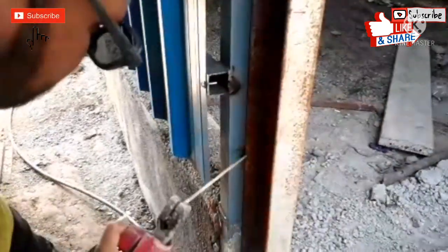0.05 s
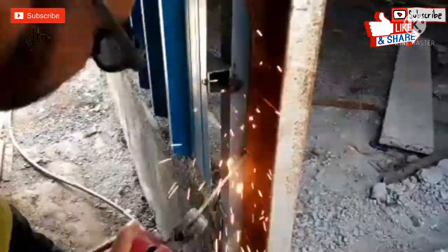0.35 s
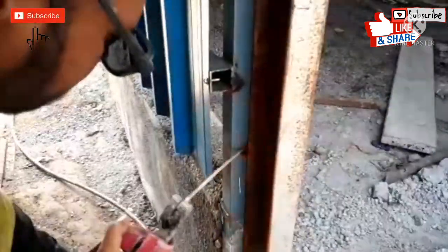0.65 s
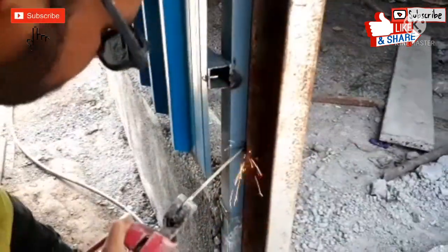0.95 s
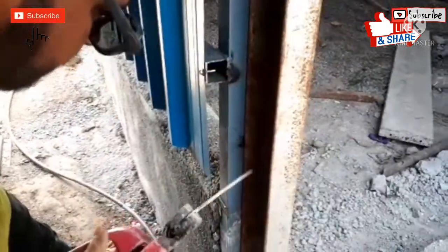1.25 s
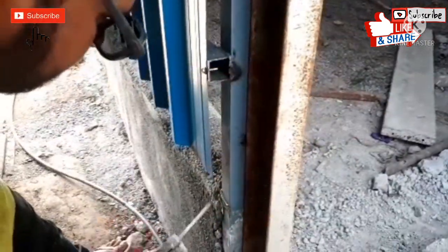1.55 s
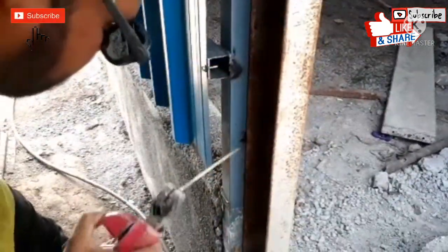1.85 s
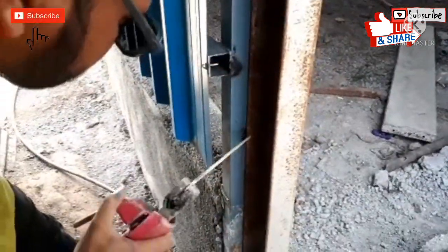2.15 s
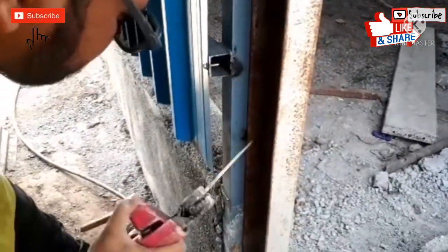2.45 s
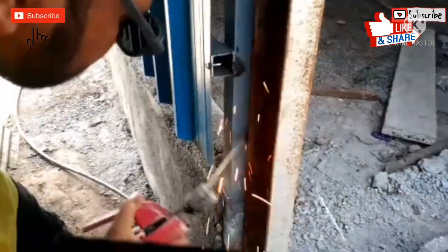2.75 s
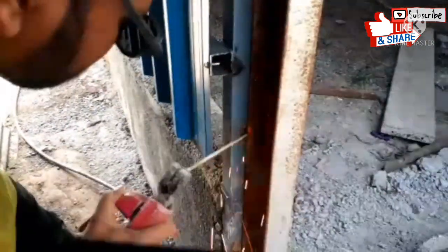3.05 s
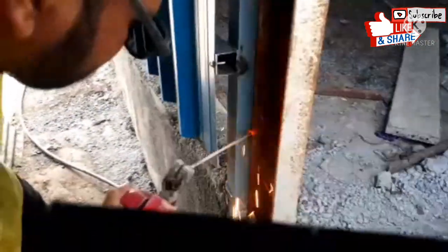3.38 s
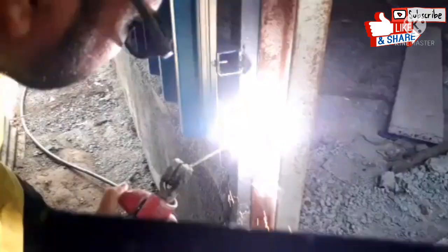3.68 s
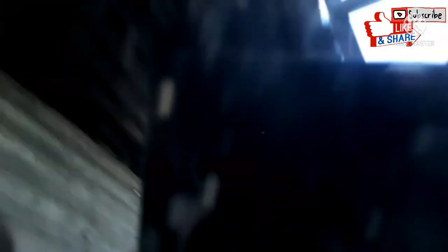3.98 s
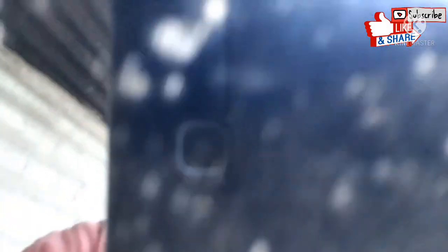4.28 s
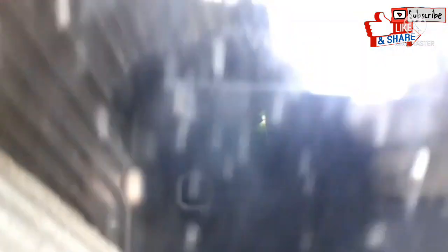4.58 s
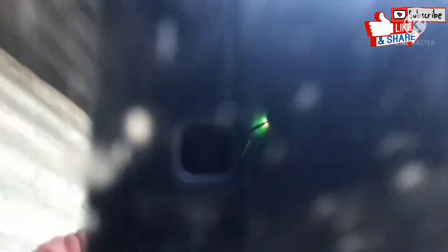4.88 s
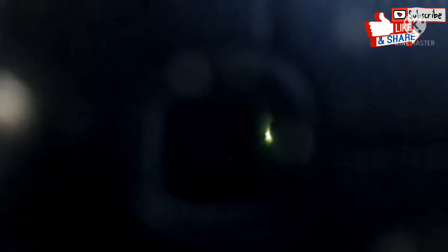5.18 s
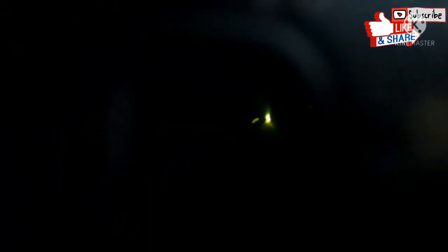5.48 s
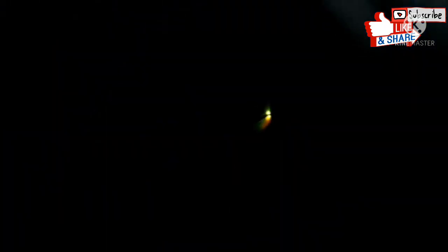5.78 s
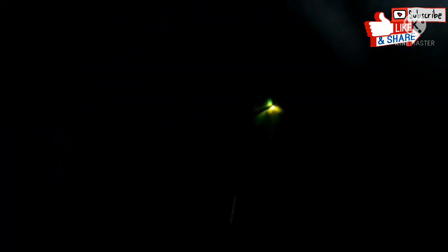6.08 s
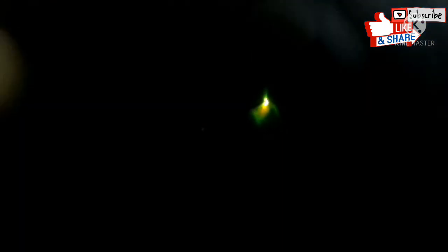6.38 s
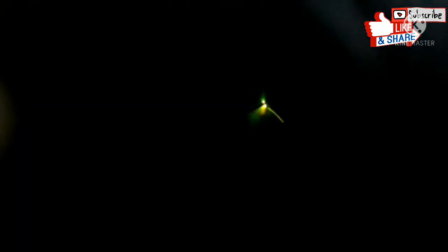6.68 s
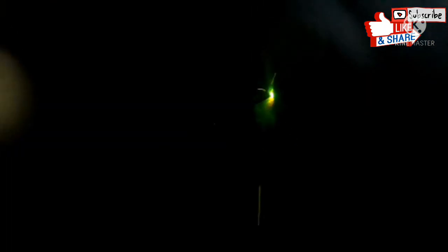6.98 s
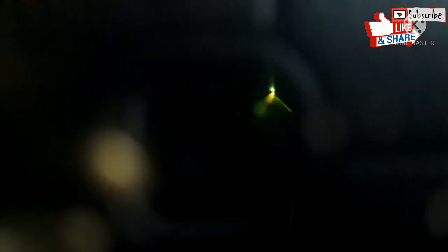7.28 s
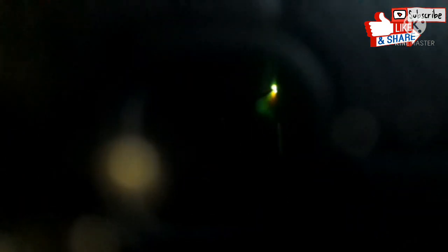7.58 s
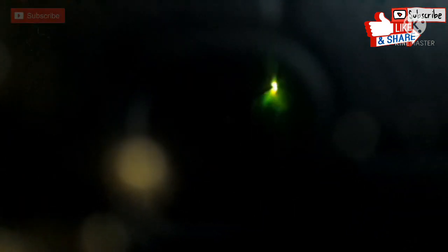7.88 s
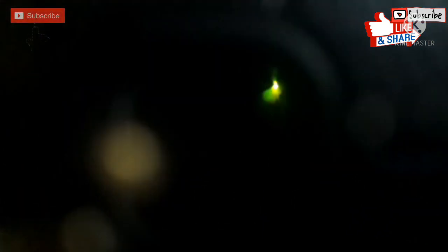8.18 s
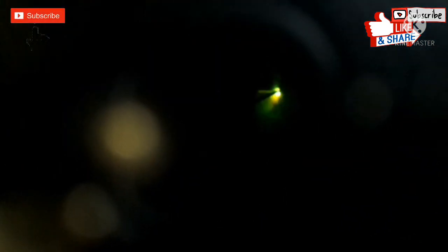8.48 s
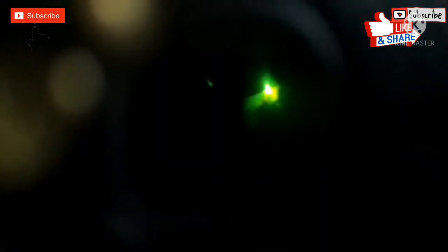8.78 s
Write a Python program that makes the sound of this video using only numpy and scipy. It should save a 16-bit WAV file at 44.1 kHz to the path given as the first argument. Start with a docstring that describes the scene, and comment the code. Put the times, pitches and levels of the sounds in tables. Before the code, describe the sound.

At about 0.3 seconds a welding arc spits briefly. From 0.5 to 2.5 seconds the rod taps and scratches on a steel frame and the floor, making light ringing clinks and dry ticks, with a pop at 1 second and the strongest clink near 1.4. Between 2.6 and 4 seconds several short arcs crackle and break off, the last lasting a little longer. After a brief gap, the arc catches at about 4.6 seconds and holds until the end, around 9 seconds, as a bright, buzzing sizzle. Molten drops burst through it in sharp, irregular pops, some with a low thump that slightly overloads the microphone. Near 5.1 seconds the sizzle turns thinner and drier as the microphone moves behind the welding shield. Everything is close, with faint workshop noise, little echo and a few dull handling bumps, mostly in the first three seconds.

```python
"""Open workshop, close to a steel door frame being stick welded.
The rod knocks and scratches on the frame and the floor, strikes a few short arcs, then holds one that
sizzles on every mains half wave. Each strike starts hot; the long ones settle. Molten drops burst with
sharp pops that overload the microphone, which moves behind the welding shield soon into the held arc."""
import sys
import numpy as np
from scipy import signal
from scipy.fft import rfft, irfft
from scipy.io import wavfile
from scipy.ndimage import uniform_filter1d

SR = 44100
rng = np.random.default_rng(int(sys.argv[2]) if len(sys.argv) > 2 else 0)


def unload_audio(sound):
    """Save the sound as a 16-bit wav file, at the path given as the first command line argument."""
    columns = np.transpose(np.atleast_2d(sound))
    # keep every value between -1 and 1, then stretch to whole-number steps
    steps = np.round(np.clip(columns, -1, 1) * 32767)
    wavfile.write(sys.argv[1], SR, steps.astype(np.int16))


N = 399105
TIME = np.arange(N) / SR
HALF_WAVE_HZ, CUTOFF_HZ = 100, 15700


def from_db(db):
    return 10 ** (np.asarray(db) / 20)


def unit_rms(x):
    return x / np.sqrt(np.mean(x ** 2) + 1e-20)


def unit_pop(x):
    """Scale to the energy of 4 ms at rms 1."""
    return x / np.sqrt(np.sum(x ** 2) / (.004 * SR))


def curve(rows):
    """Interpolate (t/s, value) rows at every sample."""
    return np.interp(TIME, *np.transpose(rows))


def drift(rate_hz):
    """Random wander, rms 1."""
    knots_s = np.arange(0, 10, 1 / rate_hz)
    values = rng.standard_normal(4096)[:len(knots_s)]
    return unit_rms(np.interp(TIME, knots_s, values))


def add(out, start_s, sound):
    """Mix a sound in at start_s."""
    i = max(round(start_s * SR), 0)
    out[i:i + len(sound)] += sound[:max(N - i, 0)]


def noise_burst(decay_s):
    """Noise with instant onset and exponential decay."""
    return rng.standard_normal(SR) * np.exp(-TIME[:SR] / decay_s)


def colour(x, spectrum, resonances=(), depth=1):
    """Unit-power minimum-phase filter from (f/Hz, level/dB) rows; depth scales the resonance peaks."""
    size = 4096
    hz = np.arange(size // 2 + 1) * SR / size + 1
    points_hz, points_db = np.transpose(spectrum)
    db = np.interp(np.log(hz), np.log(points_hz), points_db)
    for centre_hz, width_hz, peak_db in resonances:
        db += depth * peak_db / (1 + (2 * (hz - centre_hz) / width_hz) ** 2)
    gain = from_db(db)
    gain /= np.sqrt(np.mean(gain ** 2 * (hz < CUTOFF_HZ)))
    cepstrum = irfft(np.log(gain))[:size // 2]
    cepstrum[1:] *= 2
    response = irfft(np.exp(rfft(cepstrum, size)))
    return signal.oaconvolve(x, response)[:N]


def ring(x, hz, t60_s):
    """Damped mode; passes white noise at equal power."""
    r, w = 10 ** (-3 / (t60_s * SR)), 2 * np.pi * hz / SR
    gain = np.sin(w) * np.sqrt(2 * (1 - r * r))
    return signal.lfilter([gain], [1, -2 * r * np.cos(w), r * r], x + 1e-18)


def echoes(x, echo_db, count=14, first_s=.0007064, last_s=.007, sway_s=.00005):
    """Short echoes off near surfaces, at unchanged power; the comb shifts as the microphone sways."""
    out, gain = x.copy(), from_db(echo_db)
    for delay_s in np.geomspace(first_s, last_s, count) * rng.uniform(.93, 1.07, count):
        lag_s = delay_s + sway_s * drift(.97)
        out += rng.choice([-1, 1]) * gain * np.interp(TIME - lag_s, TIME, x)
    return out / np.sqrt(1 + count * gain ** 2)


def behind_shield(at_s=5.11, move_s=.15):
    """Microphone position: 0 in the open, 1 behind the shield."""
    return np.clip((TIME - at_s) / move_s + .5, 0, 1)


# background level: t/s, level/dB
BACKGROUND_LEVEL = [(0, -64), (.5, -56.5), (1.3, -51.5), (2.2, -51.5), (2.75, -47), (3.3, -59),
                    (4.25, -60.5), (4.55, -51), (9.05, -50.5)]
# background spectrum: f/Hz, level/dB
BACKGROUND_SPECTRUM = [(18, -52), (30, -24), (79, -3.5), (141, -5), (252, -11.5), (404, -10), (684, -14),
                       (1010, -13), (2010, -12.5), (2750, -11), (5450, -21.5), (8300, -19.5), (10200, -33),
                       (14800, -29), (16000, -50.5)]

def background():
    """Low workshop noise that swells and sinks."""
    return from_db(curve(BACKGROUND_LEVEL)) * colour(rng.standard_normal(N), BACKGROUND_SPECTRUM)


# rod knocks: t/s, level/dB, contact decay/s, share into the rod rather than the frame/0-1
KNOCKS = [(0.228, -45, .012, .05), (0.539, -49, .013, .5), (0.728, -36, 0.041, 0.71),
          (.831, -40, 0.0092, .05), (1.434, -22.5, 0.021, 1), (1.477, -30.5, 0.011, 1),
          (1.699, -36.5, 0.007, 0.4), (1.876, -40, 0.0037, .2), (2.063, -40.5, 0.0069, 0.7),
          (2.343, -30, 0.019, .28), (2.581, -22, 0.0055, 0), (2.84, -34, 0.011, .2)]
# rod modes: f/Hz, level/dB, t60/s
ROD_MODES = [(995, -16, 0.26), (1750, -12, 0.29), (2350, -29, 0.11), (2700, -30, .15), (3053, -0.5, 0.15),
             (3500, -24, .15), (3800, -19.5, 0.2), (4385, -21, .2), (4795, -11, 0.1), (5400, -16.5, 0.15),
             (6790, -19, .13), (7900, -12.5, 0.12)]
# hollow steel frame modes: f/Hz, level/dB, t60/s
FRAME_MODES = [(492, -4.5, 0.42), (510, -11, 0.54), (757, -6.5, 0.13), (1005, -8, 0.2), (1599, -1.5, 0.36),
               (1740, -5.5, 0.082), (2350, -10.5, 0.33), (2470, -10, 0.34), (2700, -18, 0.23),
               (3316, -22, .22), (4890, -10, 0.19), (6713, -19, .13)]
# contact and shimmer spectrum: f/Hz, level/dB
CLANK_SPECTRUM = [(200, -51), (650, -21), (900, 0), (1350, -11.5), (1800, -0.5), (3100, 0.5), (4500, -6.5),
                  (6000, -12.5), (8000, -8), (10500, -24), (15000, -25)]

def knocks(rod_db=-1, frame_db=-2, clank_db=-1, shimmer_db=-11, shimmer_s=.072):
    """Each knock chatters, rings the rod, the frame or both, and leaves a shimmer of weak modes."""
    on_rod, on_frame, shimmer = np.zeros((3, N))
    for start_s, db, decay_s, share in KNOCKS:
        contact = from_db(db) * noise_burst(decay_s)
        add(on_rod, start_s, share * contact)
        add(on_frame, start_s, (1 - share) * contact)
        add(shimmer, start_s, from_db(db + shimmer_db) * noise_burst(shimmer_s))
    rod = sum(from_db(db + rod_db) * ring(on_rod, hz, t60_s) for hz, db, t60_s in ROD_MODES)
    frame = sum(from_db(db + frame_db) * ring(on_frame, hz, t60_s) for hz, db, t60_s in FRAME_MODES)
    clank = from_db(clank_db) * (on_rod + on_frame)
    return rod + frame + colour(clank + shimmer, CLANK_SPECTRUM)


# grip bumps: t/s, level/dB, decay/s
BUMPS = [(.258, -44.5, 0.033), (0.778, -47, 0.034), (.859, -45, .015), (1.315, -34.5, 0.0054),
         (1.681, -40.5, 0.026), (2.249, -39, 0.0085), (2.34, -42, 0.014), (2.661, -42, 0.068),
         (2.73, -38.5, 0.063), (5.83, -42, .4)]

def handling(aiming_s=(.5, 3.9), fidgets=7, fidget_db=-46, fidget_decay_s=.014):
    """Dull bumps as the hand shifts its grip, plus faint random ones while the rod is aimed."""
    out = np.zeros(N)
    faint = [(start_s, fidget_db, fidget_decay_s) for start_s in rng.uniform(*aiming_s, fidgets)]
    for start_s, db, decay_s in BUMPS + faint:
        add(out, start_s, from_db(db) * noise_burst(decay_s))
    dull = [(30, -23.5), (80, 2), (130, 1), (220, -4), (450, -20.5), (1500, -53), (8000, -78.5)]
    return colour(out, dull)


# short arcs: start/s, stop/s, settled level/dB
STRIKES = [(0.276, 0.339, -35), (2.602, 2.695, -31.5), (2.888, 2.951, -30.5), (3.19, 3.261, -33.5),
           (3.492, 3.562, -36.5), (3.586, 4.003, -36.5)]
# held arc: t/s, level/dB
WELD_LEVEL = [(4.72, -27), (4.77, -29.5), (4.91, -28.5), (5.06, -33.5), (5.12, -34), (5.73, -39),
              (5.89, -36.5), (6.54, -32), (6.87, -33.5), (7.25, -34), (7.34, -37.5), (8.11, -33.5),
              (8.45, -31.5), (8.95, -33.5), (9.05, -36.5)]

def arc_gain(build_s=.0085, hot_db=7.5, hot_s=.09, settle_s=.031,
             weld_start_s=4.552, weld_hot_db=2, weld_hot_s=.17, waver_db=1.62, waver_hz=12):
    """Arc strength: strikes build, burn hot, settle if they last, and break; the weld holds."""
    gain = np.zeros(N)
    for start_s, stop_s, db in STRIKES:
        age_s = np.maximum(TIME - start_s, 0)
        build = 1 - np.exp(-age_s / build_s)
        hot = np.clip(1 - (age_s - hot_s) / settle_s, 0, 1)
        gain += (TIME < stop_s) * build * from_db(db + hot_db * hot)
    age_s = np.maximum(TIME - weld_start_s, 0)
    build = 1 - np.exp(-age_s / build_s)
    gain += build * from_db(curve(WELD_LEVEL) + weld_hot_db * (age_s < weld_hot_s))
    return uniform_filter1d(gain, size=60) * from_db(waver_db * drift(waver_hz))


def sizzle(peak_s=.0015, jitter_s=.0007, flare_s=.0015, fade_s=.0015, uneven_db=6,
           spark_rate=90, spark_db=2.5, spark_s=.0014):
    """The arc flares on each mains half wave, never twice alike, and throws tiny sparks."""
    phase = ((TIME - peak_s + jitter_s * drift(40)) * HALF_WAVE_HZ + .5) % 1 - .5
    from_peak_s = phase / HALF_WAVE_HZ
    flare = np.exp(-(2 * from_peak_s / flare_s) ** 2) * from_db(uneven_db * drift(100))
    linger = np.exp(-1 / (fade_s * SR))
    power = signal.lfilter([1 - linger], [1, -linger], flare)
    power = power / power.mean() + .13   # hiss floor between flares
    fires = rng.random(N) < spark_rate * power / SR
    sparks = fires * from_db(spark_db * np.minimum(rng.exponential(1, N), 4))
    spray = signal.lfilter([1], [1, -np.exp(-1 / (spark_s * SR))], sparks + 1e-18)
    return unit_rms(rng.standard_normal(N) * np.sqrt(power + spray ** 2))


# arc spectrum in the open: f/Hz, level/dB
OPEN_SPECTRUM = [(60, -38), (150, 3), (400, 0), (800, 4), (1500, 6.5), (2500, 5), (4200, 4.5), (5800, 3.5),
                 (6700, 11.5), (8400, 12.5), (9700, 2), (11000, -3.5), (13000, 5), (15000, 7.5)]
# resonances of the gap between the steel posts: f/Hz, width/Hz, peak/dB at depth 1
GAP_RESONANCES = [(488, 45, 10), (890, 120, 5.5), (1133, 36, 10), (1925, 77, 5), (2330, 24, 6),
                  (2900, 33, 0), (3366, 310, 9.5), (5180, 460, 6.5), (6700, 330, 3.5), (8770, 520, 4.5)]
# arc spectrum behind the shield: f/Hz, level/dB
SHIELDED_SPECTRUM = [(60, -23), (150, 2.5), (400, -13), (800, -6), (1500, -6), (2000, -8), (4200, -1),
                     (5900, -4.5), (6600, 5), (8400, 8), (9700, -9.5), (11000, -6), (13000, 1.5),
                     (15000, 3.5)]
# resonances of the space behind the shield: f/Hz, width/Hz, peak/dB at depth 1
SHIELD_RESONANCES = [(765, 360, 5), (1140, 68, -0.5), (1990, 430, 5), (2387, 250, 5), (2740, 230, 4),
                     (3430, 790, 3), (4540, 140, 2.5), (5080, 310, 5), (6620, 1140, 4.5), (8150, 350, 3),
                     (8660, 140, -1.5), (14000, 610, 3)]

def arc(gain):
    """The sizzle sounds through the gap between the posts; the shield then recolours it."""
    source, behind = gain * sizzle(), behind_shield()
    in_open = colour(source * (1 - behind), OPEN_SPECTRUM, GAP_RESONANCES, depth=1.06)
    shielded = colour(source * behind, SHIELDED_SPECTRUM, SHIELD_RESONANCES, depth=1.34)
    return echoes(in_open, echo_db=-16) + echoes(shielded, echo_db=-17.5)


# pops of molten metal, from small spits to heavy drops, some bursting twice:
# t/s, crack/dB, blast/dB, thump/dB, second burst strength/0-1
POPS = [(0.29, -21, -35, -55, 0), (0.3208, -19.5, -35, -63, 1), (1.0114, -17.5, -28.5, -42.5, 0),
        (2.611, -14.5, -28.5, -44, .7), (2.6716, -10.5, -33.5, -36, 0), (2.921, -18.5, -32, -57, 0),
        (2.9307, -11.5, -29.5, -22, .7), (3.2208, -21.5, -24.5, -23, .2), (3.242, -13.5, -52, -23, .3),
        (3.3111, -13, -18.5, -15, 0), (3.5405, -20, -24.5, -15, 0), (3.5849, -15, -30, -17.5, 0),
        (3.83, -26.5, -46, -58, 0), (3.886, -26.5, -50.5, -58, 0), (4.6808, -16, -52, -58, 0),
        (4.743, -14, -32, -49, .3), (4.763, -8.5, -49, -35, 0), (4.8192, -11, -35, -19, 0),
        (4.9007, -14.5, -38, -50, 0), (4.9647, -18, -45, -30, 0), (4.924, -17, -47, -54, 0),
        (5.03, -17.5, -37, -57, .6), (5.064, -14.5, -23.5, -19.5, 1), (5.319, -16, -40, -16.5, 0),
        (5.3599, -18, -24.5, -15, 0), (5.4927, -15.5, -16, -16.5, .9), (5.6408, -15, -29, -21.5, 0),
        (5.7241, -14.5, -29.5, -19, 0), (5.922, -17.5, -26.5, -15, .15), (6.0632, -14, -26, -12, 0),
        (6.3, -21.5, -36.5, -36, 0), (6.4208, -19, -66, -36, 0), (6.5507, -11, -30, -22, .4),
        (6.6, -17.5, -20.5, -27, 0), (6.63, -13.5, -23, -25, 0), (6.6853, -17.5, -27, -23, 0),
        (6.7212, -13, -18, -15, 0), (6.8234, -22.5, -46, -42, 0), (6.8693, -19, -40, -21, 0),
        (6.9911, -15.5, -46, -37.5, 0), (7.0207, -14, -41, -23.5, 0), (7.1036, -12.5, -28, -24.5, 0),
        (7.1753, -17, -22, -17, 0), (7.272, -17, -28, -32, 0), (7.3209, -14.5, -20.5, -26.5, 0),
        (7.3799, -18, -25.5, -20, 0), (7.44, -19, -30.5, -14, 0), (7.5654, -24, -25, -14, 0),
        (7.5833, -16.5, -23, -17, .6), (7.7208, -16.5, -30, -14.5, 0), (7.7916, -18, -29, -25.5, 0),
        (7.882, -20, -42, -43, 0), (7.9936, -13.5, -46, -31, 0), (8.253, -10.5, -33, -16, .5),
        (8.3416, -12, -24.5, -25.5, .4), (8.552, -14.5, -19, -13.5, .9), (8.7116, -15.5, -24, -31.5, 0),
        (8.853, -14.5, -36, -29, 0), (8.9935, -12, -43, -35, .9)]

def drops(gain, second_s=.0093, spits_per_s=2, usual_arc_db=-33.5, spit_db=(-25, -55, -48.5)):
    """Bursts as (t/s, crack/dB, blast/dB, thump/dB): the listed pops, some twice, and random spits."""
    bursts = []
    for start_s, *levels_db, second in POPS:
        bursts.append((start_s, *levels_db))
        if second:
            bursts.append((start_s + second_s, *np.add(levels_db, 20 * np.log10(second))))
    half_waves = np.arange(0, N, round(SR / HALF_WAVE_HZ))
    strength = gain[half_waves] / from_db(usual_arc_db)
    chance = spits_per_s / HALF_WAVE_HZ * strength ** 1.5   # a strong arc spits more often
    spits = rng.random(len(half_waves)) < chance
    sizes_db = rng.normal(0, .5, len(half_waves))
    for i, size_db in zip(half_waves[spits], sizes_db[spits]):
        bursts.append((i / SR, *np.add(spit_db, size_db)))
    return bursts


# crack spectrum: f/Hz, level/dB
CRACK_SPECTRUM = [(60, -0.5), (400, -5.5), (800, 5), (1500, 8.5), (2500, 11), (4200, 10), (5800, 8),
                  (6700, 14), (8400, 16.5), (9700, 3), (11000, 1), (13000, 9.5), (15000, 14)]

def cracks(bursts, soft_s=.0046, hard_s=.0043, front_s=.00041, split_hz=5800, neutral_blast_db=-26):
    """Each bursting drop cracks; violent ones have a steep front and a slightly shorter tail."""
    out, t = np.zeros(N), TIME[:SR // 20]
    low_pass = signal.butter(1, split_hz, fs=SR)
    for start_s, crack_db, blast_db, thump_db in bursts:
        # small drops fizz, big ones bark
        tilt = from_db(.21 * (neutral_blast_db - blast_db) + rng.standard_normal())
        hardness = np.clip((thump_db - crack_db) / 20 + 1, 0, 1)
        decay_s = soft_s + hardness * (hard_s - soft_s)
        envelope = np.exp(-t / decay_s) + 3 * hardness * np.exp(-t / front_s)
        noise = rng.standard_normal(len(t)) * envelope
        body = signal.lfilter(*low_pass, noise)
        crack = body / tilt + (noise - body) * tilt
        add(out, start_s, from_db(crack_db) * unit_pop(crack))
    behind = behind_shield()
    in_open = colour(out * (1 - behind), CRACK_SPECTRUM, GAP_RESONANCES, depth=.7)
    shielded = colour(out * behind, CRACK_SPECTRUM, SHIELD_RESONANCES, depth=.91)
    return (echoes(in_open, echo_db=-11.5, count=8, last_s=.004)
            + echoes(shielded, echo_db=-19, count=6, last_s=.003))


def blasts(bursts, blast_s=.00023, push_s=.00098, rise_s=.00036, recover_hz=115, damping=.62,
           echo_gain=.52, echo_s=(.0008, .002796)):
    """Each burst sends an N-wave, echoed by the steel; the pushed microphone swings back with a thump."""
    out, t = np.zeros(N), TIME[:SR // 20]
    w = 2 * np.pi * recover_hz
    recovery = signal.bilinear([1, 0, 0], [1, 2 * damping * w, w * w], SR)
    for start_s, _, blast_db, thump_db in bursts:
        heaviness_db = np.clip(thump_db - blast_db, -10, 20)
        stretch = from_db(.22 * heaviness_db + rng.normal(0, .29))   # heavy drop, longer wave
        u = t / (blast_s * stretch) - 2
        direct = u * np.exp(-u * u)
        echo = np.interp(t - rng.uniform(*echo_s), t, direct, left=0)
        wave = from_db(blast_db) * unit_pop(direct + echo_gain * echo)
        after_s = np.maximum(t - 2 * blast_s * stretch, 0)
        push = np.exp(-after_s / (push_s * stretch)) * (1 - np.exp(-after_s / rise_s))
        thump = from_db(thump_db) * unit_pop(signal.lfilter(*recovery, push))
        add(out, start_s, rng.choice([-1, 1]) * (wave + thump))
    return out


# rod tip scratches: t/s, level/dB
SCRATCHES = [(.707, -37), (.722, -31), (.865, -48), (1.158, -47.5), (1.433, -20), (2.34, -22.5),
             (2.348, -25), (2.838, -33), (2.847, -34)]
# scratch spectrum: f/Hz, level/dB
SCRATCH_SPECTRUM = [(150, -33.5), (500, -6.5), (2000, -10.5), (5500, -1.5), (7000, 1.5), (8700, 5.5),
                    (10500, -14.5), (15000, -13)]

def scratches(decay_s=.0058):
    """The rod's tip grates in short dry ticks."""
    out = np.zeros(N)
    for start_s, db in SCRATCHES:
        add(out, start_s, from_db(db) * noise_burst(decay_s))
    return colour(out, SCRATCH_SPECTRUM)


def tail(x, t60_s, spectrum):
    """Diffuse reverberation, starting after 5 ms."""
    t = TIME[:SR // 2]
    response = rng.standard_normal(len(t)) * 10 ** (-3 * t / t60_s) * (t > .005)
    response /= np.sqrt(np.sum(response ** 2))
    return colour(signal.oaconvolve(x, response)[:N], spectrum)


def room(x, early_db=-16, early_t60_s=.064, walls_db=-19, walls_t60_s=.21, late_db=-28, late_t60_s=.59):
    """Scatter off frame and ground, wall slap until the shield blocks it, and a faint workshop tail."""
    in_open = x * (1 - behind_shield())
    early = tail(x, early_t60_s, [(100, -7), (600, -19.5), (3000, 6), (8000, -4.5), (15000, 4.5)])
    walls = tail(in_open, walls_t60_s, [(100, -13), (600, -9.5), (3000, 7), (8000, -5), (15000, 4)])
    late = tail(x, late_t60_s,
                [(100, -19), (500, -14.5), (1500, -3), (3000, 5), (8000, 2.5), (15000, 0)])
    return from_db(early_db) * early + from_db(walls_db) * walls + from_db(late_db) * late


def scene():
    """The weld in its room, with grip bumps, over the background; mono."""
    gain = arc_gain()
    bursts = drops(gain)
    weld = arc(gain) + cracks(bursts) + blasts(bursts) + knocks() + scratches()
    return (background() + weld + room(weld) + handling())[None]


def record(dry, ceiling=2.0):
    """Soft overload rounds the loudest pops; a steep low-pass cuts the top."""
    low_pass = signal.ellip(10, .3, 60, CUTOFF_HZ, fs=SR, output="sos")
    return signal.sosfilt(low_pass, ceiling * np.tanh(dry / ceiling))


dry = scene()
out = record(dry)
unload_audio(out)
```